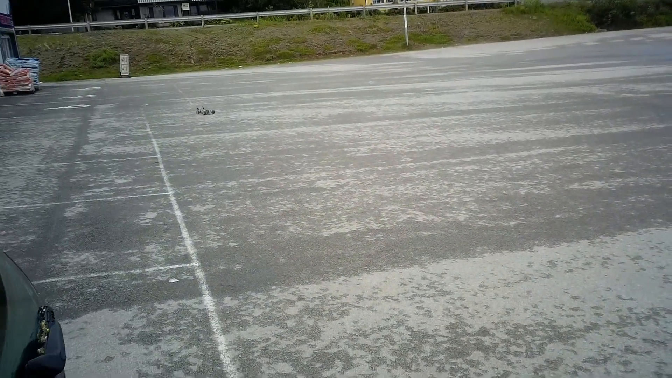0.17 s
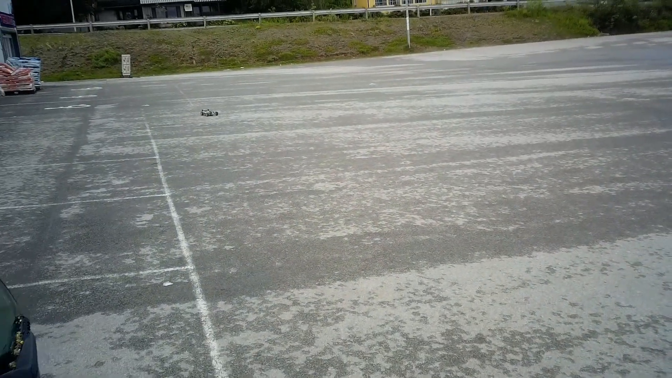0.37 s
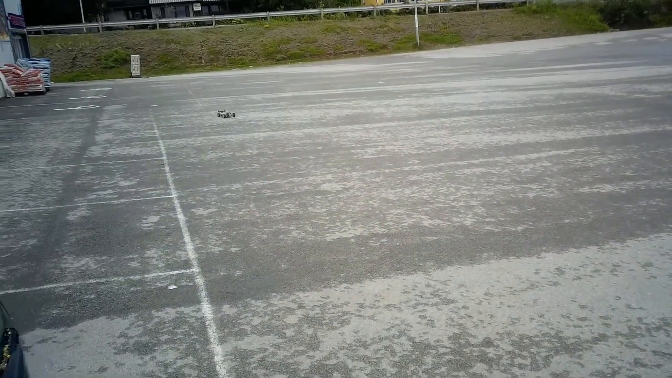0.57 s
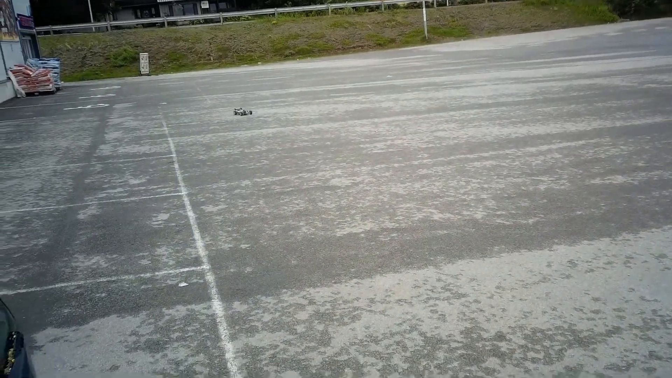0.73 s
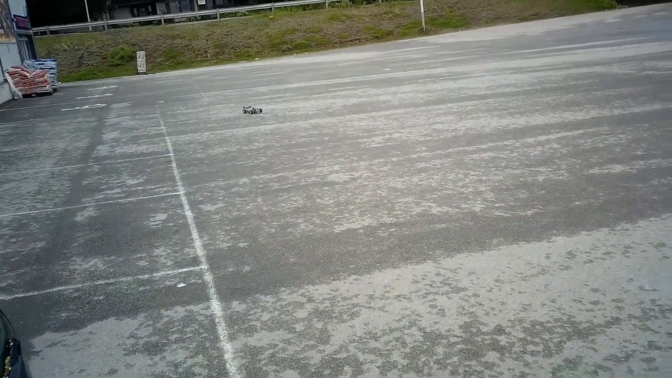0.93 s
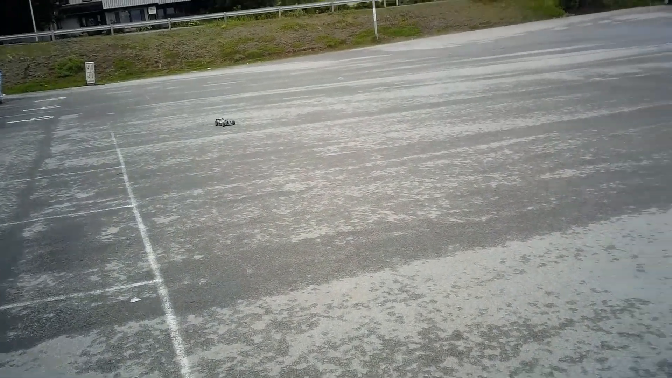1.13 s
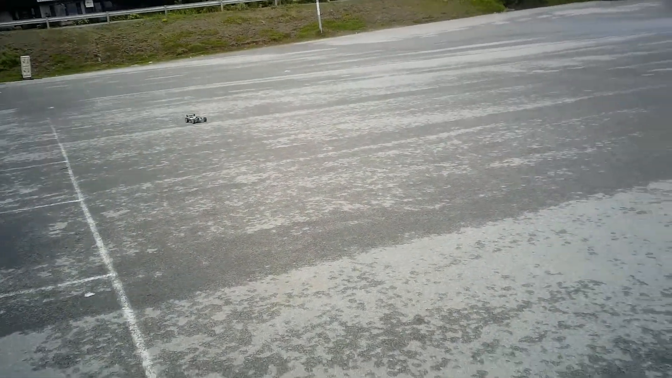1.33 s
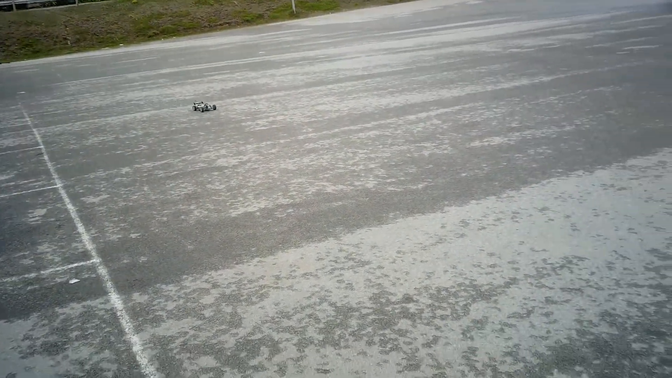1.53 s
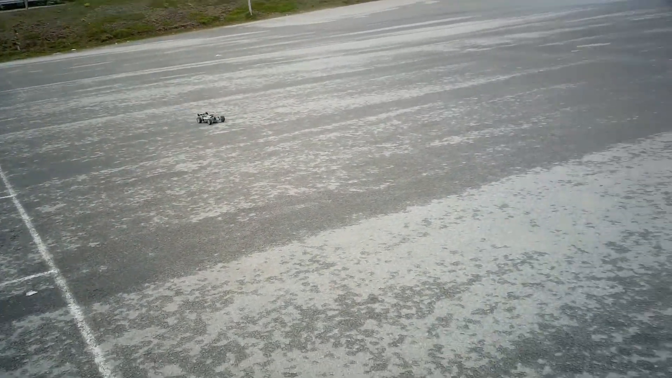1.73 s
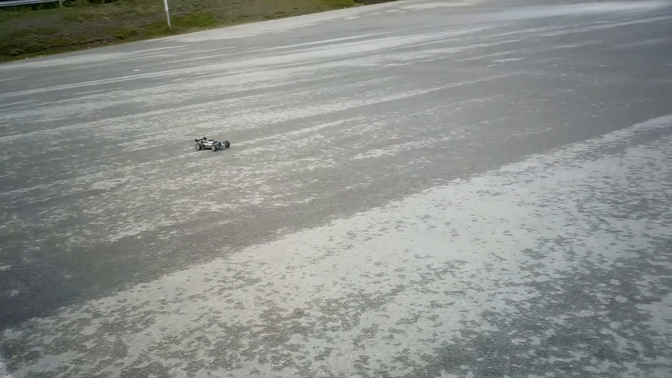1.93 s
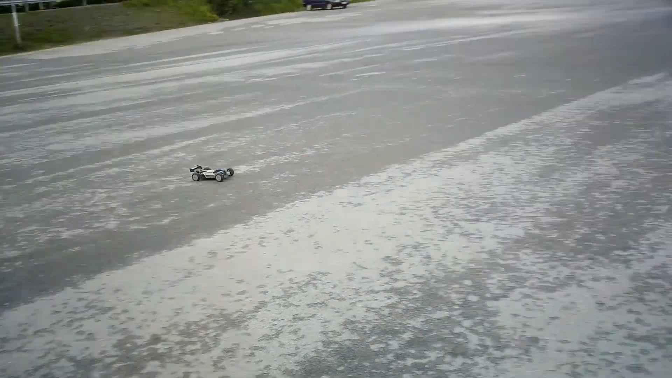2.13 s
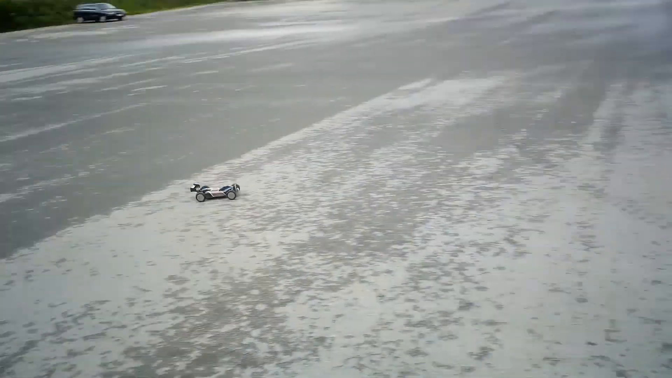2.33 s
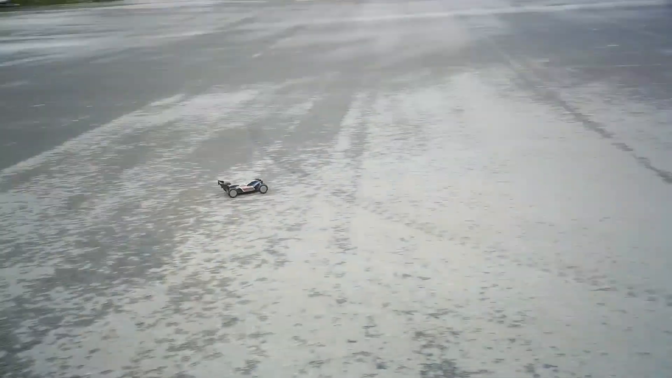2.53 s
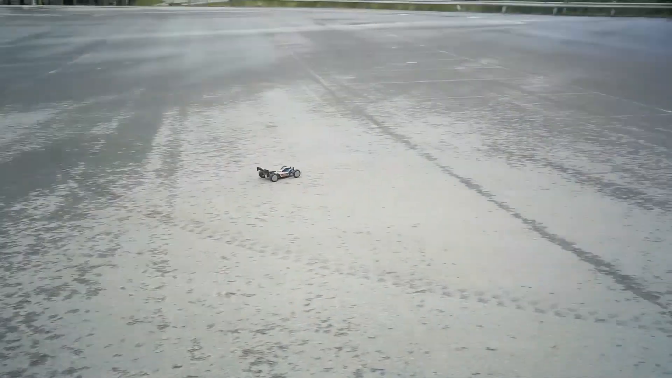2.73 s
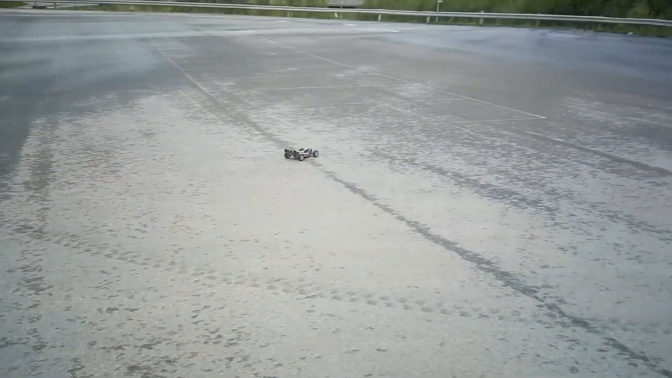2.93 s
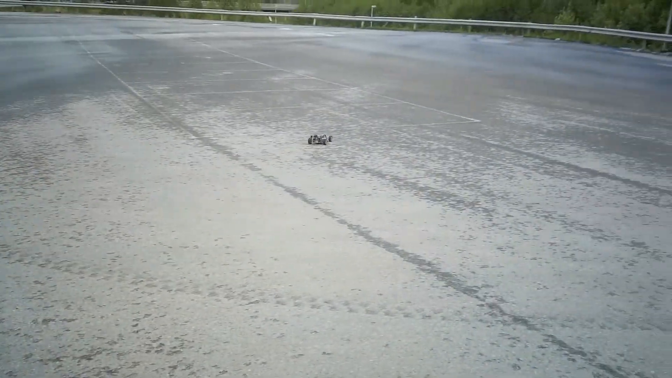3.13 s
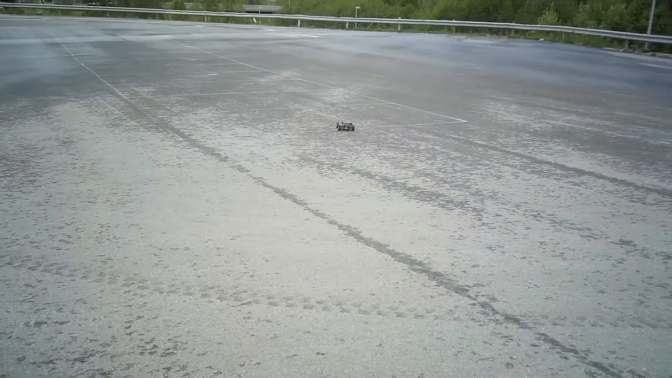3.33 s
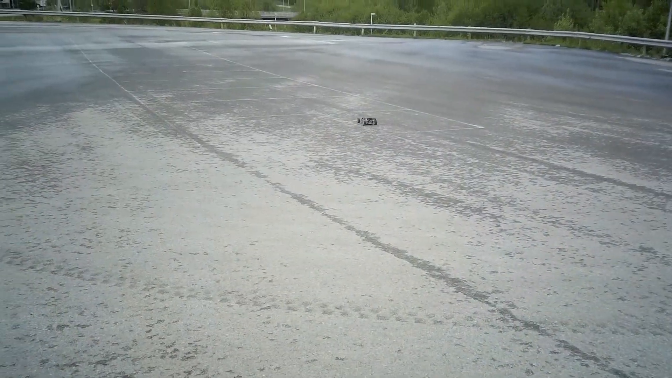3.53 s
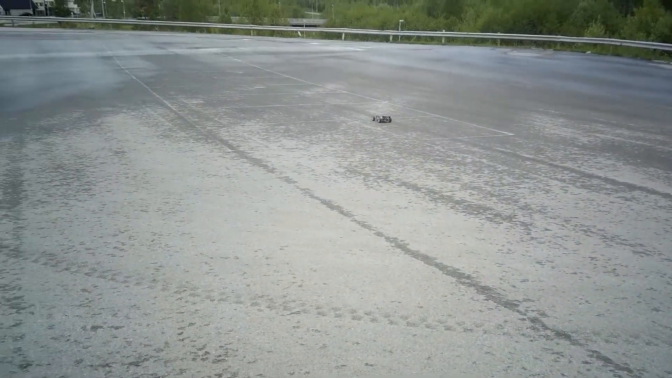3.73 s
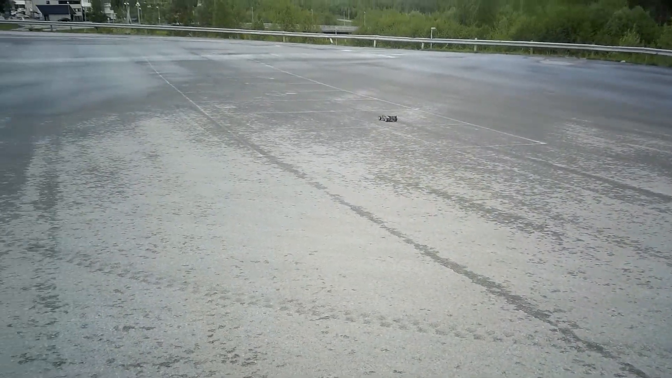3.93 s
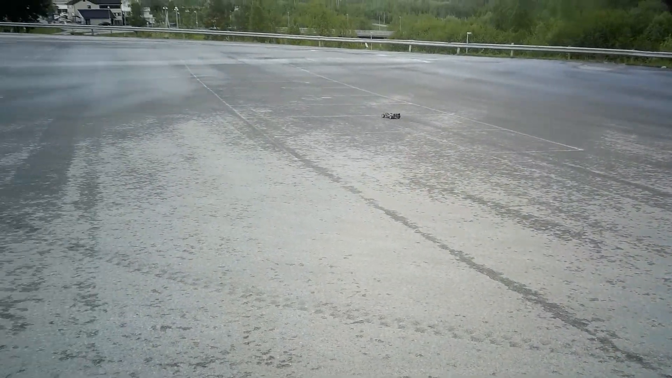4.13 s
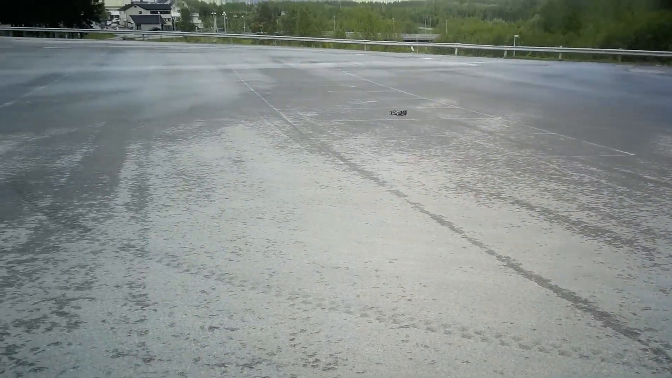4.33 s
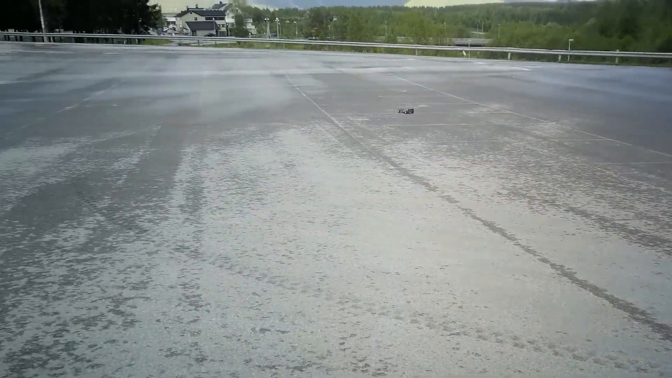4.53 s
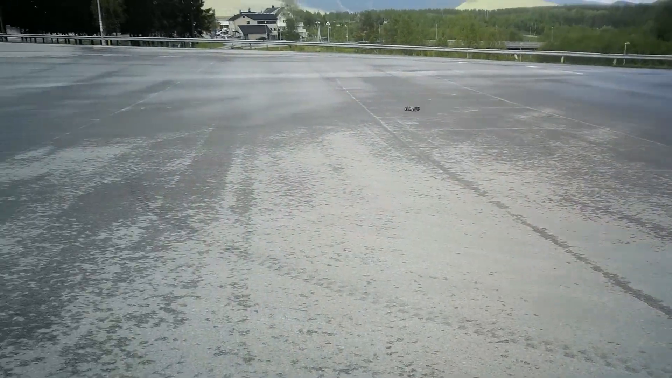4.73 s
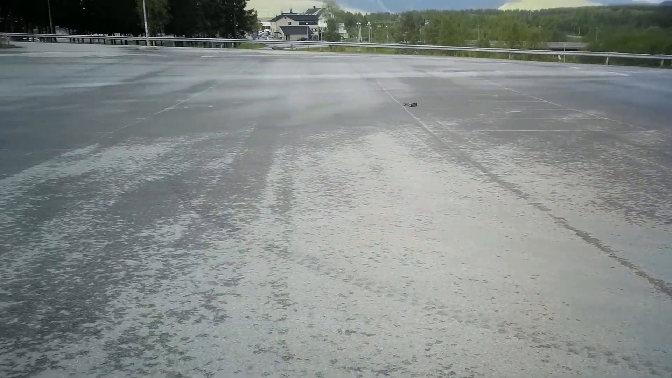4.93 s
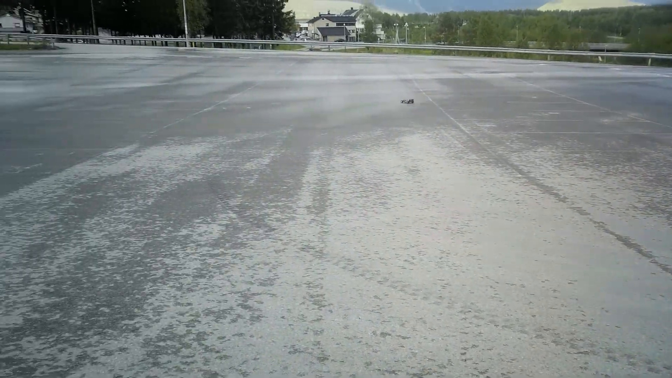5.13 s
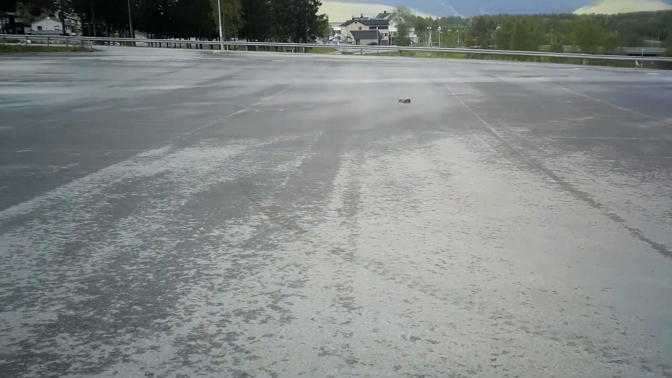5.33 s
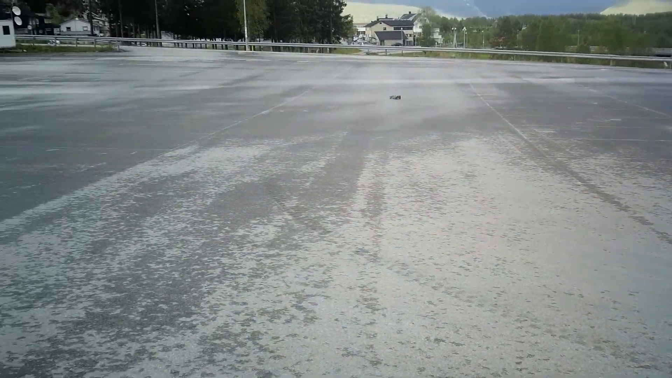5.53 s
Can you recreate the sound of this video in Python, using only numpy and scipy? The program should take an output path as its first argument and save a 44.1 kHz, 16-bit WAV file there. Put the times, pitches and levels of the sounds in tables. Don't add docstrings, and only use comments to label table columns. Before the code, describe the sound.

A small electric model car scuffs, winds up into a harsh gear whine, sweeps close past the microphone, then pulls away across asphalt.

```python
import sys
import numpy as np
from scipy import signal
from scipy.fft import rfft, irfft, next_fast_len
from scipy.io import wavfile
from scipy.ndimage import uniform_filter1d, map_coordinates

SR = 44100
rng = np.random.default_rng(int(sys.argv[2]) if len(sys.argv) > 2 else 0)


def boost_factor(decibels):
    exponent = np.asarray(decibels, float) / 20
    return 10 ** exponent


def put_to_file(sound):
    columns = np.atleast_2d(sound).T
    safe = np.clip(columns, -1, 1)
    whole_steps = np.round(safe * 32767)
    wavfile.write(sys.argv[1], SR, whole_steps.astype(np.int16))


N = 250908

CENTRE_RATIO, AXLE_RATIO = 1.98, 3.66

# f/Hz, width/Hz, level/dB
HOUSING = [(2050.4, 80, 3.5), (2321.9, 100, 4), (2603.3, 80, 1.5), (3245.5, 233.7, -6), (3852.8, 110, 5),
           (4330, 110, 4), (4770.2, 100, 4.5), (5083.4, 90, 3), (5800, 150, 3.5), (6489.5, 245.3, -3),
           (6950, 190, 3.5), (7650, 190, 4), (9094.4, 180, 4.5), (9750.8, 155.24, 3.5)]


def level(x, db):
    return x * boost_factor(db) / np.sqrt(np.mean(x ** 2))


def curves(table):
    s, *columns = np.transpose(table)
    return [np.interp(np.arange(N) / SR, s, c) for c in columns]


def walk(rate):
    hold = int(SR / rate)
    steps = np.repeat(rng.standard_normal(N // hold + 1), hold)
    smooth = uniform_filter1d(uniform_filter1d(steps, hold), hold)[:N]
    return smooth / smooth.std()


def coloured(x, table):
    hz, db = np.transpose(table)
    f = np.maximum(np.arange(N // 2 + 1) * SR / N, 1)
    return irfft(rfft(x) * boost_factor(np.interp(np.log(f), np.log(hz), db)), N)


def ring(x, hz, width_hz):
    return signal.lfilter(*signal.iirpeak(hz, hz / width_hz, SR), x)


def band(x, lo, hi):
    size = next_fast_len(N + 4096)
    f = np.arange(size // 2 + 1) * SR / size
    return irfft(rfft(x, size) * ((f >= lo) & (f < hi)), size)[:N]


def bell(hz, peak_hz, reach_hz):
    return np.exp(-.5 * ((hz - peak_hz) / reach_hz) ** 2)


def bumps(x, table):
    size = next_fast_len(N)
    f = np.arange(size // 2 + 1) * SR / size
    gain_db = sum(db * bell(f, hz, w) for hz, w, db in table)
    return irfft(rfft(x, size) * boost_factor(gain_db), size)[:N]


def shaft_beat(hz):
    turns = np.cumsum(hz) / SR / 97
    return np.cos(2 * np.pi * (turns + 0.29615)) * (1 + 0.5463 * walk(17))


def bearing_teeth():
    # t/s, length/s, then pinion, centre and axle level/dB over the load
    stretches = [(0.798, 0.129, -2, -25, -25), (0.943, 0.136, 5.5, -25, -25),
                 (1.08, 0.1543, -11.5, -25, -24.5), (1.269, 0.1063, 0, -4, -8),
                 (1.381, 0.1706, -3.5, 2.5, -2), (1.55, 0.09046, -7.5, -1.5, -1),
                 (1.639, 0.12126, -8.5, -8.5, 1.5), (1.76, 0.13899, -16.5, -7.5, 0),
                 (1.901, 0.32014, -19, -5, -10), (2.23, 0.21045, -22, -6, -12),
                 (2.47, 0.1701, -17.5, -13, 4), (2.64, 0.0784, -12, -7.5, -3.5),
                 (2.72, 0.05858, -3, -17.5, -4), (3.562, 0.32365, -4.5, -5, -3.5),
                 (3.88, 0.25931, -7, -8, -1), (4.139, 0.27687, -7.5, -21.5, -9),
                 (4.422, 0.17692, -15, -8, -10), (4.599, 0.27805, -16, -24.5, -13),
                 (4.88, 0.1633, -13.5, -7, -7.5), (5.05, 0.1006, -14, -6.5, -7),
                 (5.35, 0.21467, -16.5, -14.5, -11), (5.572, 0.1198, -19, -6, -7)]
    gains = np.zeros((3, N))
    for s, length, *db in stretches:
        gains[:, int(s * SR):int((s + length) * SR)] = boost_factor(np.array(db))[:, None]
    return uniform_filter1d(gains, 800)


def pulled(hz):
    pull, reach = .75, 1.5
    free = np.arange(0., SR / 2, 5)
    drag = sum((mode - free) * bell(free, mode, reach * w) for mode, w, db in HOUSING if db > 0)
    return hz + pull * np.interp(hz, free, drag)


def whine(hz, beat, db, throb, rough, teeth):
    cycles = np.cumsum(hz) / SR
    error = [map_coordinates(e, [cycles / teeth], order=1, mode="wrap")
             for e in rng.standard_normal((2, 8192))]
    blur = 1 + rough * (error[0] + 1j * error[1])
    tone = np.exp(throb * beat) * blur * np.exp(2j * np.pi * cycles)
    return boost_factor(db) * level(tone.real, 0)


def gears(beat, hz, db):
    mid_hz, low_hz = hz / CENTRE_RATIO, hz / AXLE_RATIO
    start_s, length_s, third_db = 3.86, .28, -8
    once = np.abs(np.arange(N) / SR - start_s - length_s / 2) < length_s / 2
    hz = pulled(hz * (1 + .013 * walk(35)))
    pinion = (whine(hz, beat, db + 2.0, throb=0.2907, rough=1.436, teeth=11)
              + whine(.98 * hz, beat, db - 3.5, throb=0.335, rough=2.807, teeth=4.5)
              + whine(np.minimum(2 * hz, 20000), beat, db - 22.5, throb=0.622, rough=2.52, teeth=25))
    hunting_hz = pulled(mid_hz * (1 + .018 * walk(14)))
    centre = (whine(hunting_hz, beat, db + 2.5, throb=0.291, rough=1.392, teeth=9)
              + whine(1.02 * mid_hz, beat, db - 2.5, throb=0.2902, rough=4.225, teeth=4.5)
              + once * whine(pulled(3 * mid_hz), beat, db + third_db, throb=0.506, rough=2.62, teeth=16))
    axle = whine(pulled(low_hz), beat, db - 1.5, throb=0.3486, rough=1.6, teeth=6)
    return bumps(np.sum(bearing_teeth() * [pinion, centre, axle], axis=0), HOUSING)


def rattle(beat, modes, throb, grain_db, flicker_db):
    force = boost_factor(grain_db * walk(700) + throb * beat)
    out = np.zeros(N)
    for hz, width_hz, db in modes:
        flicker = boost_factor(db + flicker_db * walk(9))
        hits = force * rng.standard_normal(N)
        out += flicker * ring(ring(hits, hz, width_hz), hz, 2 * width_hz)
    return level(out, 0)


def gear_case(beat, hz, gain, load_db):
    # f/Hz, width/Hz, level/dB
    case_modes = [(3774.5, 606.4, -2.5), (4245.5, 270.4, 2.5), (4677.4, 411.1, 1), (5007.6, 552.6, -6)]
    ringing_modes = [(4283.9, 98, -1.5), (4690, 262.2, 3)]
    gain = gain * boost_factor(5.5 * bell(hz / CENTRE_RATIO, 3930, 130))
    clatter = gain * rattle(beat, case_modes, throb=0.36, grain_db=2.0, flicker_db=1.08)
    ringing = boost_factor(load_db - 0.3) * bell(hz, 5800, 800)
    return clatter + ringing * rattle(beat, ringing_modes, throb=.6, grain_db=1.83, flicker_db=3.0)


def tooth_repeat(x, hz):
    alike = 0.2071

    def echo(v):
        return alike * map_coordinates(v, [np.arange(N) - SR / hz], order=3)

    return (x + echo(x + echo(x))) / np.sqrt(1 + alike ** 2 + alike ** 4)


def chassis_and_bearings(beat, hz, chassis, bearings):
    # f/Hz, width/Hz, level/dB
    chassis_modes = [(1844.3, 699, 2.5), (2389.9, 1178.6, 9), (3126.5, 1192, 0)]
    bearing_modes = [(5857.7, 1030.4, 9), (7200, 743.7, 8), (8261.2, 1289, 6), (8857, 655, -1.5),
                     (12144, 537.5, 3.5), (13375, 520, -8.5), (13901, 1780, -4.5)]
    coasting = 1. * (bearing_teeth().max(axis=0) < 1e-3)
    bearings = bearings * boost_factor(-5 * uniform_filter1d(coasting, 4000))
    clatter = (chassis * rattle(beat, chassis_modes, throb=0.469, grain_db=1.5, flicker_db=3.5)
               + bearings * rattle(beat, bearing_modes, throb=0.529, grain_db=2.5, flicker_db=1.5022))
    return tooth_repeat(clatter, hz / AXLE_RATIO)


def tyres():
    # f/Hz, level/dB
    tyre_colour = [(150, -19.5), (300, -3.5), (500, 1.5), (900, 2), (1300, 4.5), (1800, -0.5), (3000, -27)]
    # t/s, first cancelled f/Hz, share 0-1
    bounce = [(1.6, 1312, 0.21), (1.85, 963, 0.12), (2.1, 623.2, 0.24), (2.3, 421.4, 0.32),
              (2.55, 254.4, 0.01), (2.95, 258.8, 0.29), (3.3, 399.1, 0)]
    grains = rng.standard_normal(N) * boost_factor(1.0292 * walk(300) + 0.7848 * walk(12))
    roll = level(coloured(grains, tyre_colour), 0)
    notch_hz, share = curves(bounce)
    share = np.clip(share, 0, .9)
    late = map_coordinates(roll, [np.arange(N) - SR / (2 * notch_hz)], order=1)
    return (roll + share * late) / np.sqrt(1 + share ** 2)


def skids():
    # t/s, peak level/dB, rise/s, fall to -60 dB/s
    slides = [
        (0, -65, 0.000946, .7),
        (.326, -40, 0.02943, 0.2641),
        (0.394, -42, 0.05126, 0.3868),
        (.7, -65, 0.01064, 0.2548),
        (.86, -61.5, 0.01195, 0.0015),
    ]
    t = np.arange(N) / SR
    gain = np.zeros(N)
    for s, db, rise, fall in slides:
        decay = boost_factor(-60 * np.maximum(t - s - rise, 0) / fall)
        gain += boost_factor(db) * np.clip((t - s) / rise, 0, 1) * decay
    return gain


def knocks():
    # t/s, peak level/dB, centre f/Hz
    cracks = [(0.325, -29, 2316), (0.338, -30.5, 2845), (0.346, -24, 2388), (0.3552, -21, 2301),
              (0.367, -21, 3486), (0.4126, -31.5, 2287), (0.4286, -36.5, 4668), (0.444, -25.5, 2343),
              (0.713, -47.5, 1670), (1.5996, -17, 2301), (1.975, -20, 4690), (3.252, -21.5, 1907)]
    out, t = np.zeros(N), np.arange(600) / SR
    for s, db, hz in cracks:
        crack = rng.standard_normal(600) * np.exp(-t / 0.005022)
        crack = ring(ring(crack, hz, 1134.8), hz, 3122)
        i = int(s * SR)
        out[i:i + 600] += boost_factor(db - 5.0) * crack / np.abs(crack).max()
    return out


def town():
    # f/Hz, level/dB per Hz
    traffic_colour = [(20, -7.5), (76, -6), (200, -3.5), (500, -7.5), (900, 0), (1200, -4), (2500, -19.5),
                      (5000, -31), (9500, -31), (15300, -38)]
    # t/s, level/dB
    hum_fade = [(0, -63.5), (.55, -62.5), (1.2, -67), (2.5, -73.5), (5.69, -70)]
    hum = level(ring(rng.standard_normal(N), 69.246, 11.08), 0) * boost_factor(curves(hum_fade)[0])
    return level(coloured(rng.standard_normal(N), traffic_colour), -54) + hum


def scene():
    # t/s, f/Hz
    speed = [(.75, 1596), (1.25, 3748), (1.57, 5452), (1.9, 9300), (2.44, 10190), (2.5, 8898), (2.72, 7200),
             (2.8, 4201), (3.85, 4349), (4.12, 5398), (4.36, 6650), (4.5, 7850), (4.6, 6950), (4.83, 6804),
             (4.97, 7800), (5.13, 6891), (5.35, 6707), (5.69, 8048)]
    # t/s, level/dB
    load = [(.05, -69), (.76, -74), (.95, -63), (1.27, -59), (1.39, -43.5), (1.7, -43.5), (1.93, -34.5),
            (2.44, -34), (2.47, -43), (3.12, -45), (3.48, -55.5), (3.58, -43.5), (4.37, -42.5), (4.5, -37),
            (4.83, -50), (4.97, -39.5), (5.22, -57), (5.69, -44)]
    rolling = [(.6, -61.5), (1.02, -51), (1.22, -55.5), (1.42, -44.5), (1.68, -42.5), (1.9, -37.5),
               (2.35, -35.5), (2.8, -37.5), (3.3, -41.5), (3.45, -50), (3.62, -44), (3.9, -46.5),
               (4.55, -44.5), (4.84, -53.5), (5.07, -45), (5.24, -57.5), (5.5, -58.5), (5.69, -49)]
    # level/dB at the usual roll and load, share of roll, share of load
    follows = [
        (-44.5, .62, .45),
        (-50, .5, .6),
        (-55, .04, 1.03),
    ]
    skid_shares = 0.3, 0.6, -4, -14.5
    usual_db = -45
    (hz,), (load_db,), (roll_db,), skid = curves(speed), curves(load), curves(rolling), skids()
    steady = [roll_db]
    for db, of_roll, of_load in follows:
        steady.append(db + of_roll * (roll_db - usual_db) + of_load * (load_db - usual_db))
    tyre, chassis, case, bearings = (boost_factor(db) + boost_factor(skid_db) * skid
                                     for db, skid_db in zip(steady, skid_shares))
    beat = shaft_beat(hz)
    car = (gears(beat, hz, load_db)
           + gear_case(beat, hz, case, load_db)
           + chassis_and_bearings(beat, hz, chassis, bearings)
           + tyre * tyres())
    return (car + knocks() + town())[None]


def patchy(x, lo, hi, spans, stay, stray):
    t = np.arange(N) / SR
    on = sum((t > a) & (t < b) for a, b in spans) > 0
    parts = np.linspace(lo, hi, 7)
    out = np.zeros(N)
    for a, b in zip(parts, parts[1:]):
        inside = (t < spans[0][1]) | (walk(30) > stay)
        gate = np.where(on, inside, walk(30) > stray)
        out += band(uniform_filter1d(1. * gate, 500) * band(x, a, b), lo, hi)
    return out


def thin_treble(x):
    limits = 10060, 11400, 12620, 13200, 15080
    # from t/s, to t/s
    upper_open = [(0, .31), (1.8, 2.49), (2.51, 2.58)]
    top_open = [(0, .31), (.56, 1.31), (1.81, 1.86), (1.93, 2.48), (2.52, 2.7), (2.8, 2.92), (2.98, 3.18),
                (3.24, 3.27), (3.38, 3.77), (4.02, 4.08), (4.14, 4.48), (4.6, 5.05), (5.13, 5.66)]
    a, b, c, d, e = limits
    ragged = uniform_filter1d(1. * (walk(20) > 0), 500) * boost_factor(-17)
    edges = band(ragged * x, a, a + 330) + band(ragged[::-1] * x, b - 330, b)
    steady = band(x, 0, a) + band(x, b, c)
    return steady + edges + patchy(x, c, d, upper_open, -1.5, 1.5) + patchy(x, d, e, top_open, -.5, 2.3)


def band_limit(x):
    return signal.sosfilt(signal.butter(12, 15490, fs=SR, output="sos"), x)


def record(dry):
    # f/Hz, width/Hz, level/dB
    port = [(422.1, 59.2, 1), (1619.7, 109.85, -2), (2176, 230, 0), (4373.5, 44.83, 2.5),
            (4981.7, 218.3, 0.5), (5284.7, 54, -2), (5668.5, 323, 1), (6397, 140.2, -1), (6802.2, 404, 2.5),
            (8280.4, 59.25, -3), (9463.8, 82.9, 6)]
    mix = thin_treble(bumps(dry[0], port))[None]
    return band_limit(mix)


dry = scene()
out = record(dry)
put_to_file(out)
```